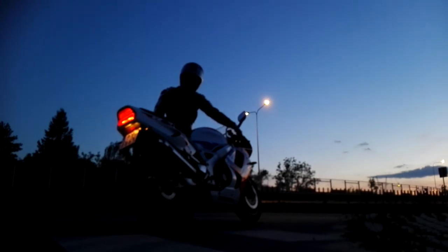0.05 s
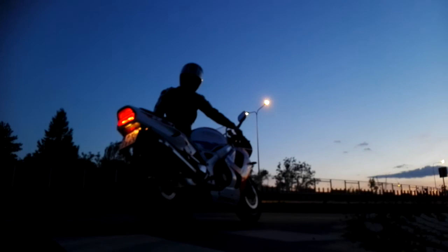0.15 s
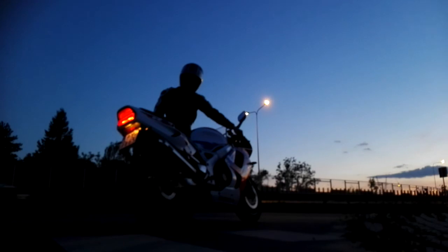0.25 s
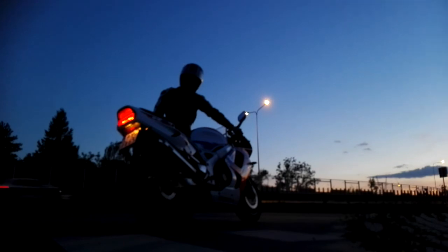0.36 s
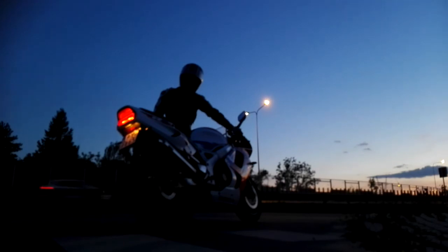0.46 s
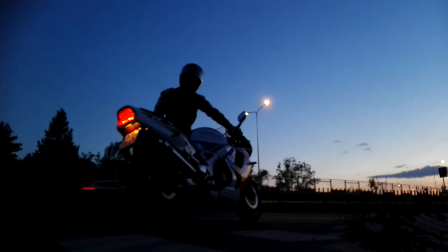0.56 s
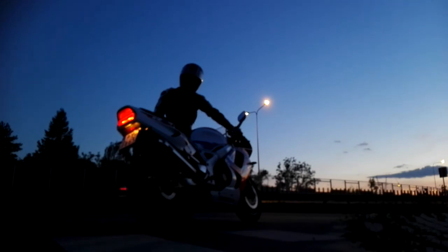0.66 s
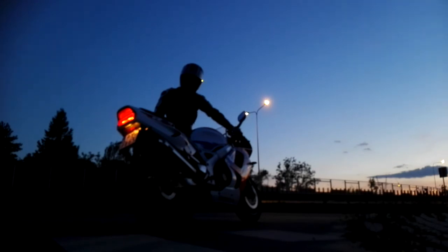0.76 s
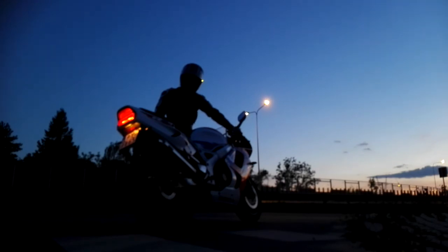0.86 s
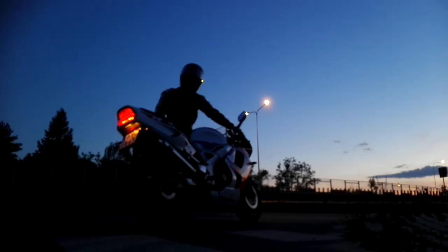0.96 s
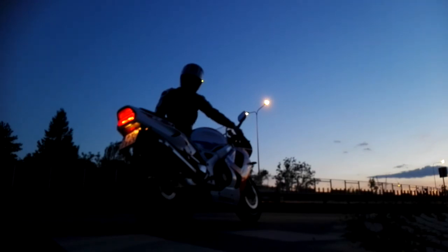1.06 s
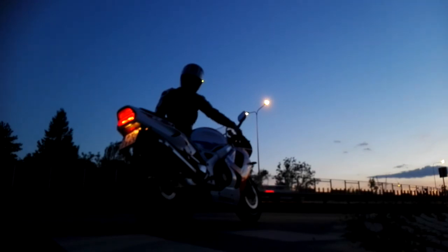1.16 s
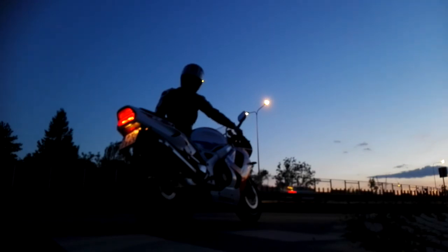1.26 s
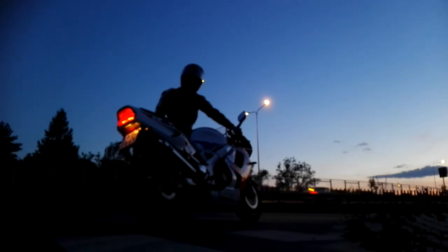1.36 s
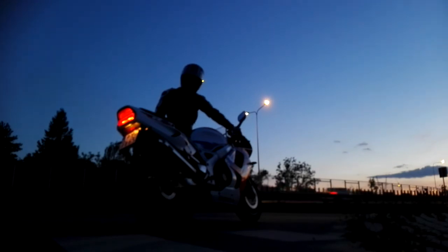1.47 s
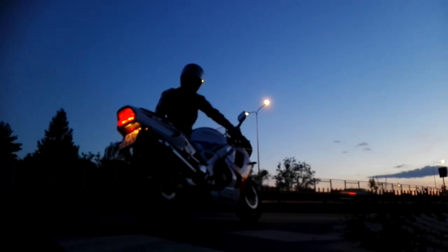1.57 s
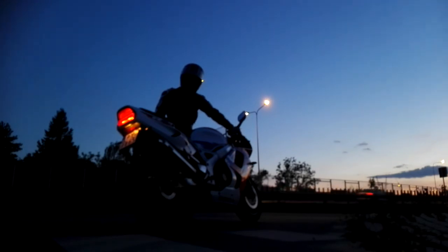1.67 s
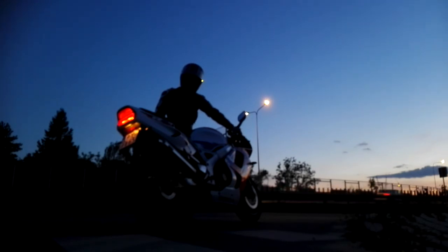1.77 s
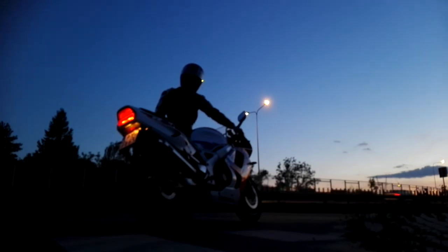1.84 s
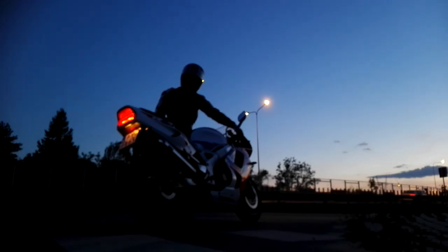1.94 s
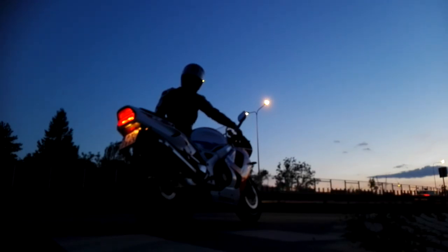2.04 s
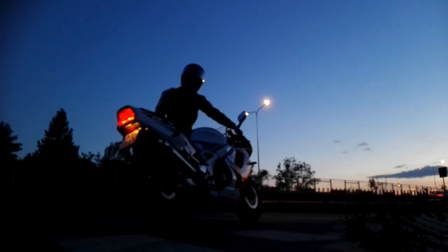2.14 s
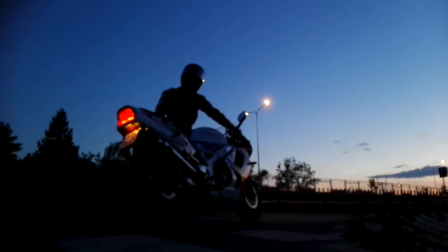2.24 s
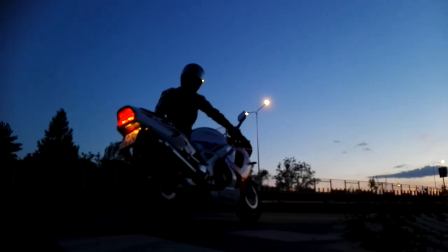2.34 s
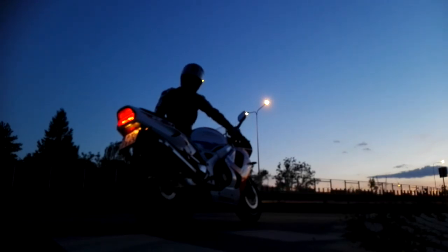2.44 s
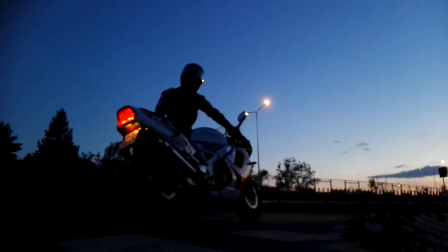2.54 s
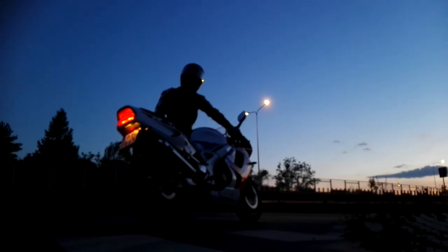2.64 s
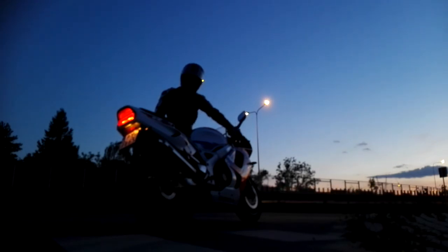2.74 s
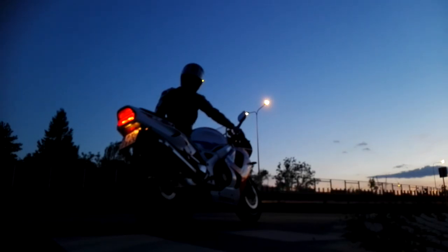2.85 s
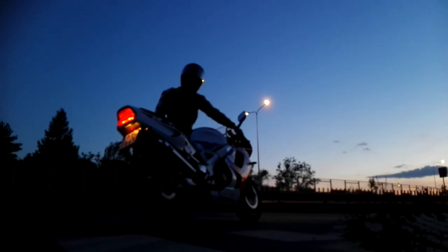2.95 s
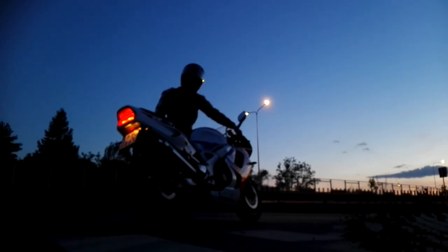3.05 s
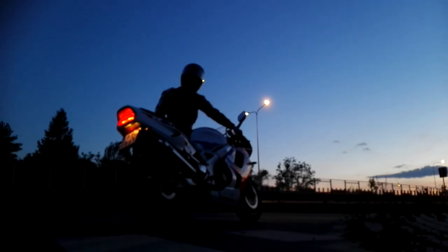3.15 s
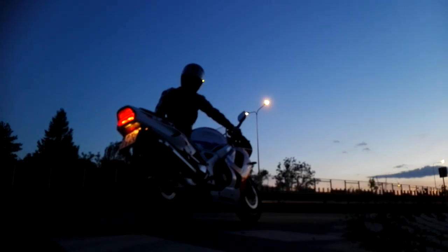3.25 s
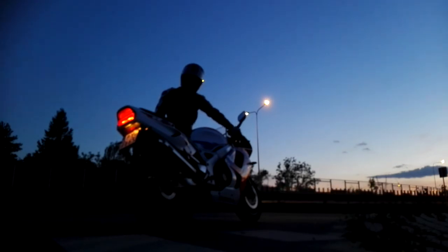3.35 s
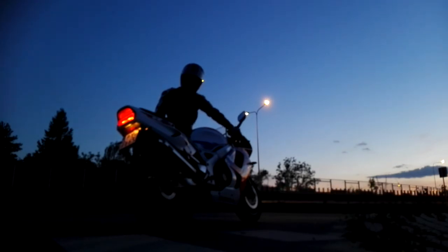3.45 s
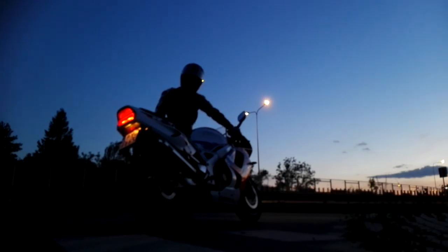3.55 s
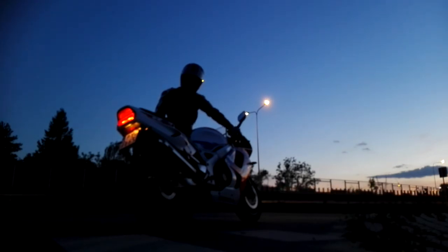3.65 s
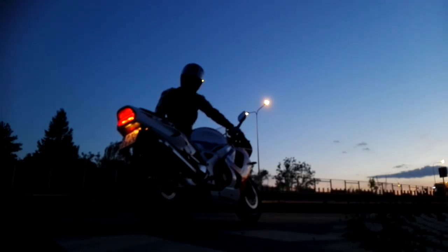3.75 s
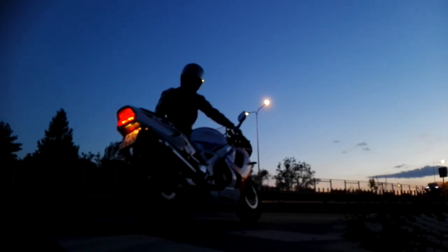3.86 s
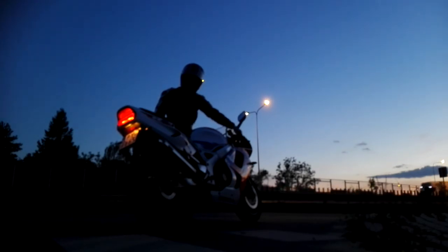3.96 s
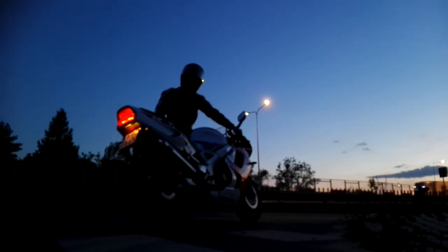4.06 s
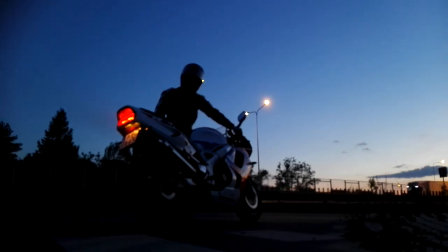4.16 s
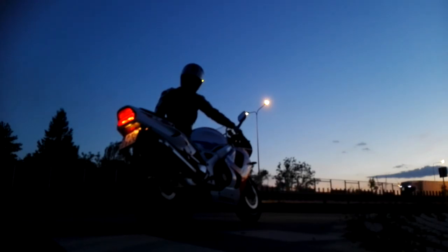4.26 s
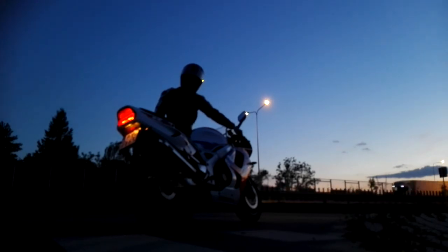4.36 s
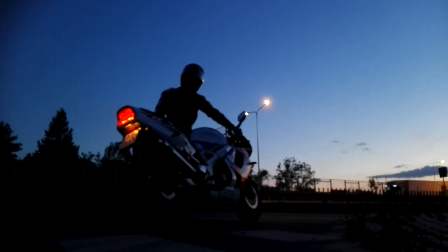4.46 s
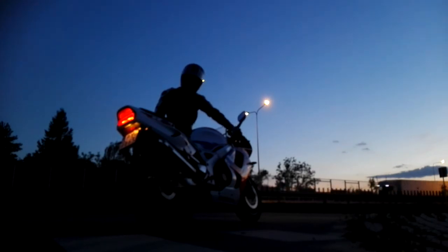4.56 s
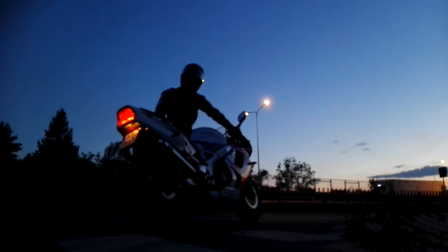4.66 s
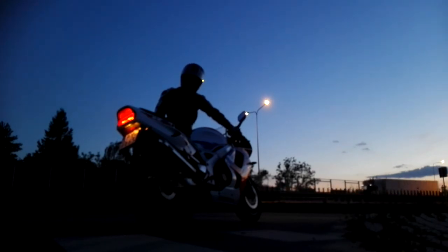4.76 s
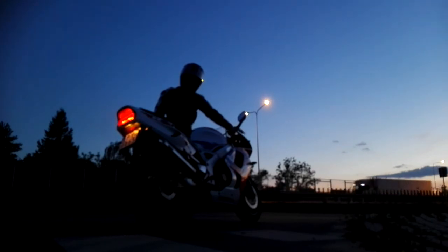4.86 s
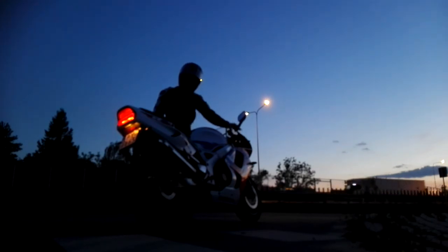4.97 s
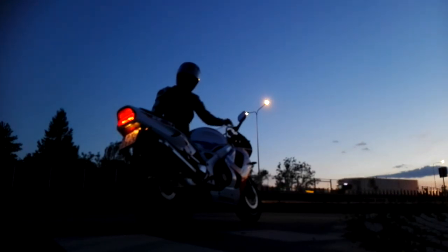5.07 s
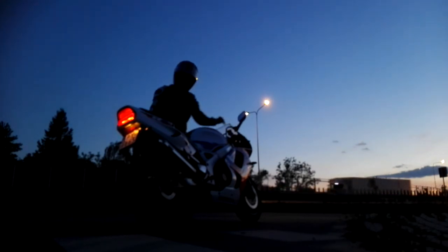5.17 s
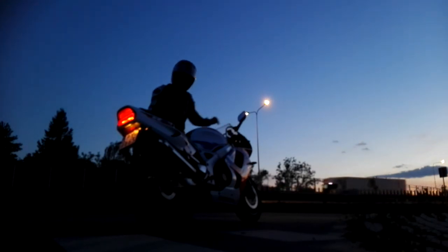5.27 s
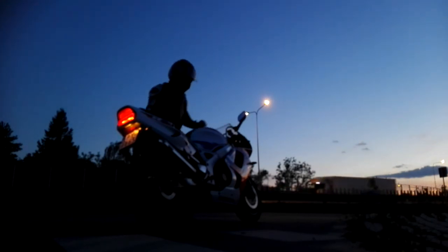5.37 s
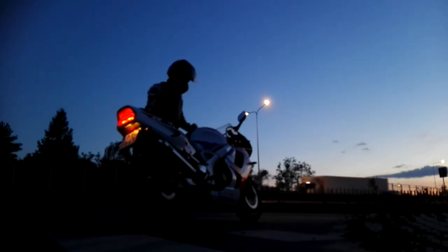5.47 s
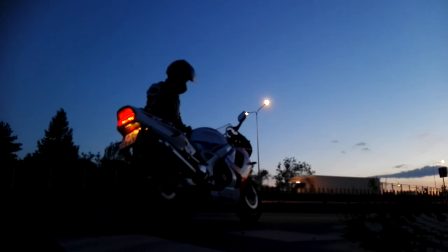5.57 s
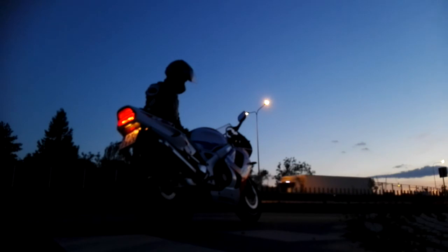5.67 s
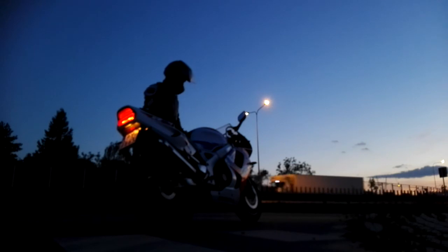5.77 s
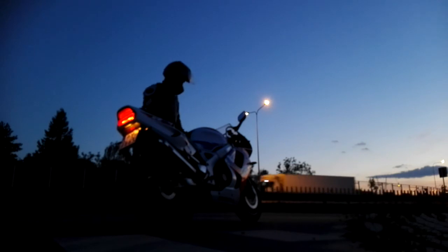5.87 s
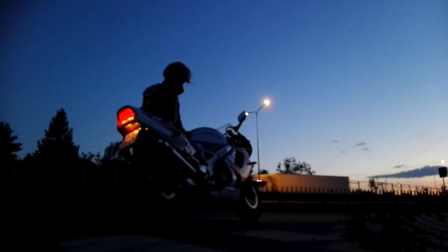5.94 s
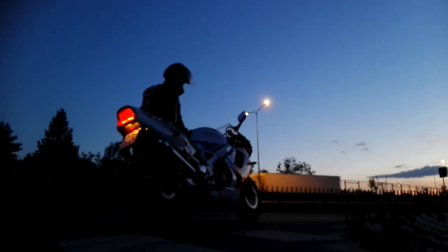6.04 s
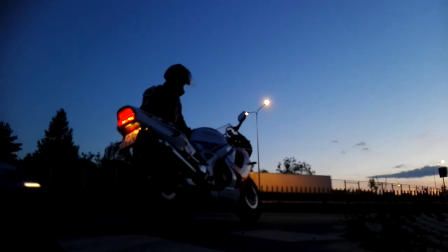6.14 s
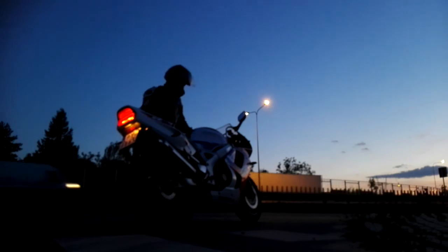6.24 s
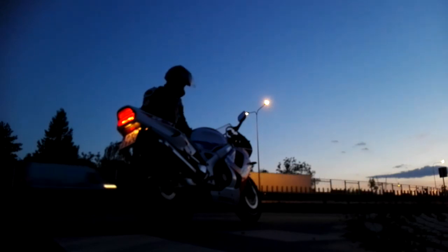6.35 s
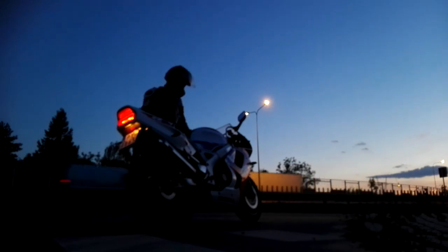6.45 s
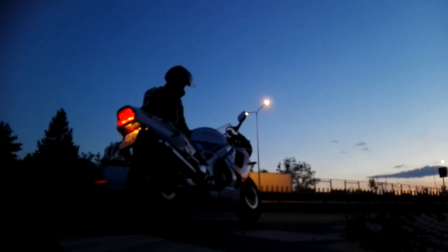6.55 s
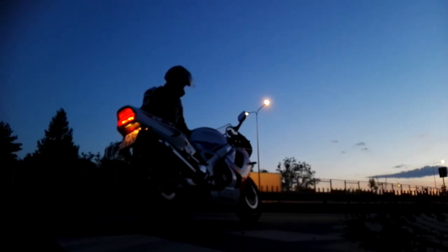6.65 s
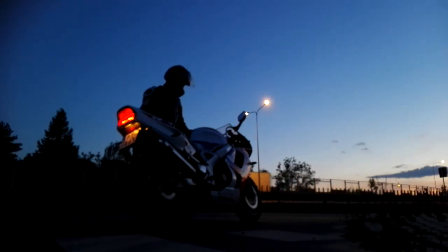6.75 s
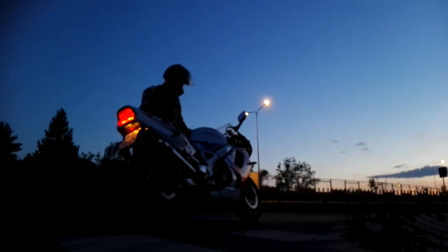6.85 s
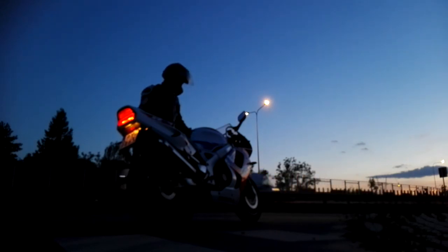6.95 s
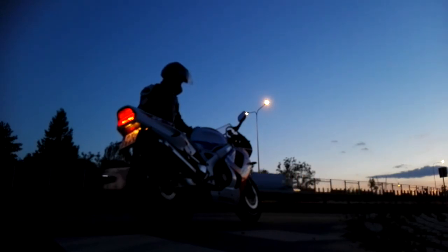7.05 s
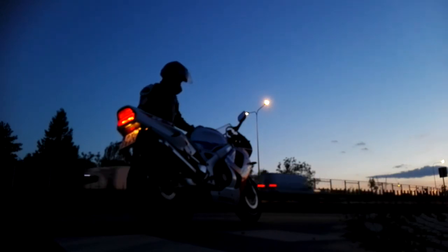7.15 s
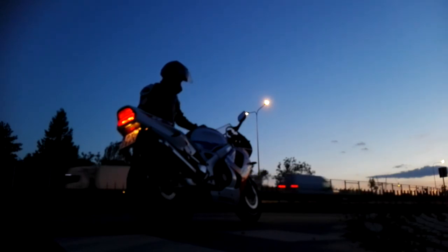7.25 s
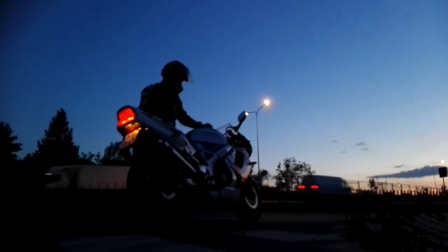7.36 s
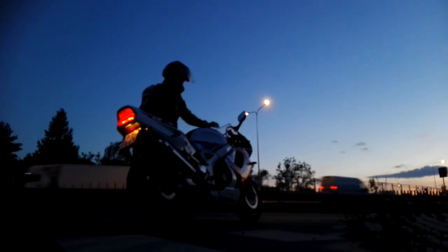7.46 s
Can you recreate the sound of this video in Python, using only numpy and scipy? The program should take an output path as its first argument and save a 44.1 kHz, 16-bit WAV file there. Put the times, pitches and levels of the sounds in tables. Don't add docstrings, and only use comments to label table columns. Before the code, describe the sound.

Outdoors beside a road, a four-cylinder motorcycle with a loud open exhaust is blipped repeatedly at standstill. Each pull rises steeply, hits the rev limiter and stutters in sharp crackling bursts, then drops with a pop into a cleaner falling howl. After the last blip the engine winds down to soft, lumpy idle puffs over faint tyre hiss. Close, loud, slightly saturated microphone, with short echoes from ground and trees.

```python
import sys
import numpy as np
from scipy import signal
from scipy.fft import rfft, irfft
from scipy.io import wavfile
from scipy.ndimage import uniform_filter1d

SR = 44100
rng = np.random.default_rng(int(sys.argv[2]) if len(sys.argv) > 2 else 0)


def to_wav(s):
    ch = np.atleast_2d(s).T
    pcm = np.round(np.clip(ch, -1, 1) * 32767)
    wavfile.write(sys.argv[1], SR, pcm.astype(np.int16))


def makeup_ratio(level_db):
    decades = np.asarray(level_db, float) / 20
    return 10 ** decades


N = 331191


def rms_one(x):
    return x / np.sqrt(np.mean(x ** 2) + 1e-20)


def band(x, low_hz, high_hz, order=2):
    return signal.sosfilt(signal.butter(order, [low_hz, high_hz], "band", fs=SR, output="sos"), x)


def lag(x, seconds):
    r = np.exp(-1 / (seconds * SR))
    return signal.lfilter([1 - r], [1, -r], x)


def resonate(x, modes, sway_db=0.):
    out = 0
    for hz, width_hz, db in modes:
        r = np.exp(-np.pi * width_hz / SR)
        poles = [1, -2 * r * np.cos(2 * np.pi * hz / SR), r * r]
        ring = signal.lfilter([(1 - r * r) / 2, 0, (r * r - 1) / 2], poles, x)
        sway = sway_db * np.interp(np.arange(N), np.linspace(0, N, 120), rng.standard_normal(120))
        out = out + makeup_ratio(db + sway) * ring
    return out


def evened(x, seconds):
    return x / np.sqrt(uniform_filter1d(x ** 2, int(seconds * SR)) + 1e-12)


def gate(spans, values):
    out = np.zeros(N)
    for (start, end), value in zip(spans, values):
        out[int(start * SR):int(end * SR)] = value
    return out


def delayed(x, seconds):
    return np.pad(x, (round(seconds * SR), 0))[:N]


# (frequency [Hz], level per Hz [dB])
TRAFFIC_COLOUR = [(260, -45.5), (450, -3), (520, -4.5), (789, -10), (1230, -6), (1440, -10.5), (1870, -8.5),
                  (2390, -16.5), (4490, -21.5), (14000, -50.5)]


def traffic():
    level_db, lorry_s, lorry_db_per_s = -74.5, 7.16, 5
    colour_hz, colour_db = np.transpose(TRAFFIC_COLOUR)
    hz = np.maximum(np.arange(N // 2 + 1) * SR / N, 1)
    shape = makeup_ratio(np.interp(np.log(hz), np.log(colour_hz), colour_db))
    hiss = rms_one(irfft(rfft(rng.standard_normal(N)) * shape, N))
    swell = makeup_ratio(1.6 * rms_one(lag(lag(rng.standard_normal(N), .1), .1)))
    nearing = lorry_db_per_s * np.maximum(np.arange(N) / SR - lorry_s, 0)
    return makeup_ratio(level_db + nearing) * swell * hiss


# (time [s], frequency [Hz], level [dB])
LORRY_WHINE = [
    (5.85, 3020, -106),
    (5.999, 2832, -58),
    (6.1, 2670, -63),
    (6.199, 2563, -66),
    (6.301, 2560, -95),
]


def lorry_whine():
    s, hz, level_db = np.transpose(LORRY_WHINE)
    t = np.arange(N) / SR
    tone = np.sin(2 * np.pi * np.cumsum(np.interp(t, s, hz)) / SR)
    flutter = rms_one(lag(rng.standard_normal(N), 0.0023))
    return makeup_ratio(np.interp(t, s, level_db, left=-120, right=-120)) * tone * flutter


# (throttle opens [s], speed then [strokes/s], limiter reached [s],
#         spark relit with throttle shut [s], speed then [strokes/s])
BLIPS = [
    (.385, 219, .585, 1.02, 378),
    (1.4, 259, 1.565, 1.928, 384),
    (2.27, 271, 2.42, 2.924, 380),
    (3.26, 272, 3.412, 3.84, 386),
    (4.15, 288, 4.283, 4.292, 385),
    (4.5, 316, 4.625, 4.945, 376),
]
# (time [s], speed [strokes/s])
RUN_DOWN = [
    (5.16, 307.4),
    (5.43, 223),
    (5.53, 202),
    (5.91, 130),
    (6.22, 90.6),
    (6.43, 72.7),
    (6.89, 47.7),
    (7.2, 42.5),
    (7.51, 44.5),
]


def speed():
    start_rate, top_rate, limit_rate = 327.6, 399, 385.5
    points = [(0, start_rate)] + RUN_DOWN
    for opened, low_rate, full, relit, relit_rate in BLIPS:
        points += [(opened, low_rate), (relit, relit_rate)]
        if relit - full > .1:
            points += [(full - .005, top_rate), (full + .03, limit_rate), (relit - .005, limit_rate)]
    return np.interp(np.arange(N) / SR, *np.transpose(sorted(points)))


SPARK_BURSTS = [
    [.631, .687, .742, .798, .853, .908, .981],
    [1.608, 1.663, 1.718, 1.775, 1.825, 1.881],
    [2.468, 2.527, 2.582, 2.636, 2.704, 2.756, 2.81, 2.868],
    [3.463, 3.519, 3.576, 3.645, 3.697, 3.753, 3.814],
    [4.672, 4.727, 4.784, 4.838, 4.883],
]


def sparks():
    burst_s, every_s, rest_share, level_db = .0195, .055, .35, -11.5
    start = np.concatenate(SPARK_BURSTS)
    wait = np.concatenate([np.r_[np.diff(run), every_s] for run in SPARK_BURSTS])
    length = burst_s + rest_share * (wait - every_s)
    return gate(zip(start + .001, start + length), np.full(len(start), makeup_ratio(level_db)))


# (speed [strokes/s], first order [dB], second order [dB], bark [dB], crack [dB], rumble [dB])
COASTING = [(45.3, -51, -52, -88, -95, -81), (61, -45, -59, -72, -75.5, -51.5),
            (75.3, -41, -42, -65.5, -67, -46.5), (114.5, -33.5, -41.5, -53.5, -62, -43),
            (129.4, -31, -43, -48.5, -58, -39.5), (165.4, -29, -49.5, -40.5, -49.5, -63),
            (199.3, -25.5, -50, -33.5, -41.5, -62), (232, -21, -48, -24, -21.5, -36),
            (267, -27, -35, -26, -23.5, -58.5), (298, -23, -39, -20.5, -18.5, -34.5),
            (354.5, -26.5, -37.5, -28, -29, -68.5), (356, -25, -44, -24.5, -24, -43)]
# (speed [strokes/s], first order [dB], second order [dB], bark [dB], crack [dB], rumble [dB])
PULLING = [(217, -20, -30.5, -26.5, -40, -48), (272, -22, -34, -21.5, -20, -28),
           (313, -17, -32.5, -17.5, -18, -25.5), (355, -24.5, -25, -16.5, -11, -20.5),
           (410, -32, -22.5, -15, -15.5, -21), (426, -18, -12, -1.5, 3, -31)]
# (first order [dB], second order [dB], bark [dB], crack [dB], rumble [dB])
SPARK_CUT = (-23, -28, -26.5, -31, -26)
# (first order [dB], second order [dB], bark [dB],
# crack [dB], rumble [dB])
AFTERBURN = (0.5, 2.5, 5.5, 7.5, 12)
# (first order [dB], second order [dB], bark [dB], crack [dB], rumble [dB])
FUEL_GULP = (0.12, 0.1, 5, 6, 3)
# (time [s], length [s], strength [1])
BURN_OFF = [
    (0.0, 0.081, 0.41),
    (1.021, 0.082, 0.75),
    (1.932, 0.013, 2.1),
    (1.945, 0.062, 0.87),
    (2.918, 0.081, 1.08),
    (3.838, 0.025, 0.81),
    (4.287, 0.026, 0.83),
    (4.33, 0.15, 0.65),
    (4.946, 0.057, 0.92),
]


def controls():
    rate = speed()
    opened, _, full, relit, _ = np.transpose(BLIPS)
    ones = np.ones(len(BLIPS))
    pulling = gate(zip(opened, full), ones)
    limited = gate(zip(full, relit), ones)
    burns = gate([(s, s + length) for s, length, _ in BURN_OFF], [row[2] for row in BURN_OFF])
    burning = lag(burns, .009)
    gulp = lag(gate(zip(opened + .006, opened + .022), ones), .0016)
    cut = lag(limited, .0013)
    push = lag(pulling + limited, .0098) * np.clip(pulling + limited, 0, 1)
    shut, wide = np.transpose(COASTING), np.transpose(PULLING)
    levels = []
    for shut_db, wide_db, cut_db, burn_db, gulp_db in zip(shut[1:], wide[1:], SPARK_CUT, AFTERBURN, FUEL_GULP):
        coasting = np.interp(rate, shut[0], shut_db) + burn_db * burning
        open_db = np.interp(rate, wide[0], wide_db) + gulp_db * gulp
        running = coasting + push * (open_db - coasting)
        levels.append(running + cut * (cut_db - running))
    return rate, levels, sparks(), pulling, limited


CYLINDER_LEVELS = [0, -5, -.6, -5.5]
CYLINDER_DELAYS = [0, .022, -.004, .019]


def strokes(rate, spread_db, jitter):
    count = np.cumsum(rate) / SR
    at = np.flatnonzero(np.diff(np.floor(count)))
    cylinder = np.arange(len(at)) % 4
    chance = rng.standard_normal((len(at), 2))
    late = np.array(CYLINDER_DELAYS)[cylinder] + jitter[at] * chance[:, 1]
    at_late = np.clip(at + np.round(late * SR / rate[at]).astype(int), 0, N - 1)
    clicks = np.zeros(N)
    clicks[at_late] = makeup_ratio(np.array(CYLINDER_LEVELS)[cylinder] + spread_db[at] * chance[:, 0])
    return count, clicks


# (time [s], level [dB])
IDLE_LEVELS = [
    (5.75, -38),
    (5.892, -50.5),
    (6.312, -46),
    (7.21, -54),
    (7.328, -46.5),
    (7.51, -53),
]
# (frequency [Hz], width [Hz], level [dB])
SILENCER = [(70, 40, -2), (125, 50, 0), (180, 50, -2), (245, 40, 0)]


def idle(rate):
    lumpy = np.clip(60 / rate, 0, 1.4) ** 2
    _, clicks = strokes(rate, 2.4 * lumpy, .06 * lumpy)
    s, level_db = np.transpose([(4.31, -85.5)] + IDLE_LEVELS)
    level = makeup_ratio(np.interp(np.arange(N) / SR, s, level_db) + 5.5)
    puffs = resonate(rms_one(clicks) + .6 * rng.standard_normal(N), SILENCER)
    return level * evened(band(puffs, 30, 258, order=8), .3)


def rumble(clicks, level_db, burst):
    uneven = band((evened(clicks, .06) + 1) * rng.standard_normal(N), 30, 290)
    thud = lag(np.roll(burst > 0, int(.0028 * SR)) * 1., .008)
    return makeup_ratio(level_db + 5.5) * evened(uneven, .05) * (.39 + .65 * thud)


# (multiple of stroke rate [1], level relative to first order [dB])
WEAK_ORDERS = [(.25, -29.5), (.5, -23.5), (.75, -36), (1.25, -28.5), (1.5, -12.5), (1.75, -35),
               (2.25, -18.5), (2.5, -48.5), (2.75, -31.5)]


def drone(count, rate, first_db, second_db, load, misfire, pulling):
    boom_hz, boom_width_hz, boom_db = 167, 16, 12
    turn = 2 * np.pi * count
    waver = 1 + (.05 + .22 * load) * rms_one(band(rng.standard_normal(N), 15, 120))
    weak = misfire * makeup_ratio(-9.5) * np.cos(turn / 2)
    for k, db in WEAK_ORDERS:
        lift_db = boom_db * np.exp(-((k * rate - boom_hz) / boom_width_hz) ** 2)
        weak = weak + makeup_ratio(db - 4.5 + lift_db) * np.cos(k * turn + k * k)
    third_db = -28 + 18.6 * np.exp(-((3 * rate - 1140) / 70) ** 2) * (1 - .6 * pulling)
    lines = makeup_ratio(first_db) * (np.cos(turn) + weak + makeup_ratio(third_db) * np.cos(3 * turn))
    return -np.sqrt(2) * waver * (lines + makeup_ratio(second_db) * np.cos(2 * turn + .4))


def blasts(clicks, rough, tail_s, steady):
    gusts = evened(lag(clicks, tail_s), .049)
    flow = ((1 - steady) * gusts + steady) * rng.standard_normal(N)
    return -np.sqrt(1 - rough) * evened(clicks, .02) + np.sqrt(rough) * flow


# (frequency [Hz], width [Hz], level [dB])
PIPE_COASTING = [(655, 120, 2), (722, 160, -15), (1139, 170, 6.5), (1310, 540, -5.5), (1639, 62, 13.5),
                 (1819, 120, 9.5), (1850, 48, -17)]
# (frequency [Hz], width [Hz], level [dB])
PIPE_HOT = [(616, 20, -7.5), (914, 170, -1.5), (1310, 120, -7.5), (1332, 190, -1), (1640, 71, 1),
            (1890, 43, 3.5)]
# (frequency [Hz], width [Hz], level [dB])
PIPE_COLD = [(580, 60, 18), (1010, 80, 10)]


def pipe_bark(clicks, rough, steady, pulling, slow, level):
    shocks = blasts(clicks, rough ** 2.6, .0015, steady)
    hot = lag(pulling, .01)
    rings = hot * resonate(shocks, PIPE_HOT, 1.5) + (1 - hot) * resonate(shocks, PIPE_COASTING, 1.5)
    rings = rings + slow * resonate(shocks, PIPE_COLD)
    return level * evened(band(rings, 250, 2150, order=3), .04)


# (frequency [Hz], width [Hz], level [dB])
OUTLET = [(2688, 470, 12), (3040, 600, 1.5), (4010, 810, -3), (4310, 660, -14), (4740, 64, 4),
          (5410, 630, -16), (5600, 100, -16)]
# (frequency [Hz], width [Hz], level [dB])
OUTLET_LIP = [(7627, 87, 14.5), (8910, 2700, 3), (9100, 840, -7), (10040, 1400, -20.5), (13500, 1600, 2)]


def outlet_crack(clicks, rough, steady, level):
    round_trip_s, share_back = .00091, .3
    loop = np.r_[1, np.zeros(round(round_trip_s * SR) - 1), -share_back]
    shocks = signal.lfilter([1], loop, blasts(clicks, rough, .0012, steady))
    crack = evened(band(resonate(shocks, OUTLET, 2.5), 2500, 8000), .04)
    sizzle = evened(band(resonate(shocks, OUTLET_LIP, 3), 6500, 17000), .04)
    return level * (crack + makeup_ratio(-9.5) * (10 * level) ** (1 / 5) * sizzle)


def tarmac_bounce(sharp):
    return .75 * (sharp + makeup_ratio(-1.5) * lag(delayed(sharp, .000181), .00003))


# (delay [s], level [dB])
ECHOES = [
    (.011, -17),
    (.029, -17),
    (.052, -22),
]


def echoes(sharp):
    return sum(makeup_ratio(db) * lag(delayed(sharp, s), .00004) for s, db in ECHOES)


# (frequency [Hz], width [Hz], level [dB])
SIDE_HISS = [(5940, 300, 10), (7000, 400, 9.5), (9800, 2400, 25.5), (11700, 500, -25.5), (14200, 500, 15.5)]


def side_hiss(level):
    air = resonate(rng.standard_normal(N), SIDE_HISS, 6.0)
    return rms_one(band(air, 4000, 17000, order=4)) * level * makeup_ratio(-18.5)


def scene():
    rate, (first_db, second_db, bark_db, crack_db, rumble_db), burst, pulling, limited = controls()
    firing = (burst > 0) * limited
    rate = rate * (1 + .1 * limited * lag((firing - .38) * limited, .04))
    load = np.clip(pulling + lag(firing, .0015), 0, 1)
    spread_db = .35 + .4 * load + 1.5 * limited
    jitter = .0006 + .002 * load + .005 * limited
    count, clicks = strokes(rate, spread_db, jitter)
    slow = np.clip((235 - rate) / 50, 0, 1)
    rough = np.clip(.33 + .05 * pulling + .2 * limited + .25 * firing + .65 * slow, 0, 1)
    steady = np.clip(.45 + .25 * firing + .5 * slow, 0, 1)
    flare = np.maximum(burst + .14 * (burst - lag(burst, .012)), lag(burst, .0026))
    calm = .12 * (1 - load) * (1 - slow) * (1 - limited)
    shocks = clicks ** (1.4 - .4 * np.maximum(pulling, limited))
    crack_level = makeup_ratio(crack_db) + flare
    bark_level = makeup_ratio(bark_db) + makeup_ratio(-4.0) * flare
    crack = outlet_crack(shocks, rough - calm, steady, crack_level)
    bark = pipe_bark(clicks, rough, steady, pulling, slow, bark_level)
    sharp = tarmac_bounce(crack + bark)
    first_db = first_db - 14 * lag(firing, .003)
    second_db = second_db - 2 * lag(firing, .003)
    tone = drone(count, rate, first_db, second_db, load, lag(limited, .01), pulling)
    background = traffic() + lorry_whine()
    middle = background + idle(rate) + rumble(clicks, rumble_db, burst) + tone + sharp + echoes(sharp)
    return middle + side_hiss(crack_level) * np.array([[1], [-1]])


def top_cut(x):
    return signal.sosfilt(signal.butter(12, 15630, fs=SR, output="sos"), x)


def record(dry):
    low_pass = signal.ellip(10, .5, 60, 14300, fs=SR, output="sos")
    cut = signal.sosfilt(low_pass, np.tanh(dry))
    mix = 1.982 * np.tanh(cut / 1.996)
    return top_cut(mix)


dry = scene()
out = record(dry)
to_wav(out)
```